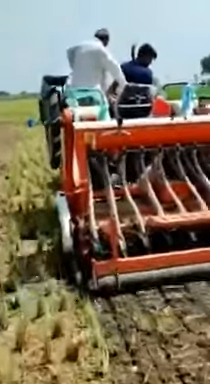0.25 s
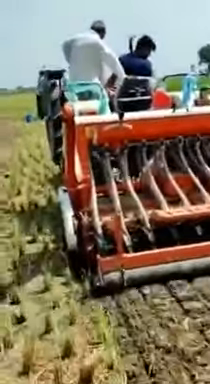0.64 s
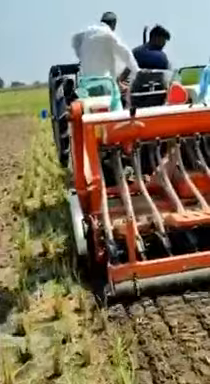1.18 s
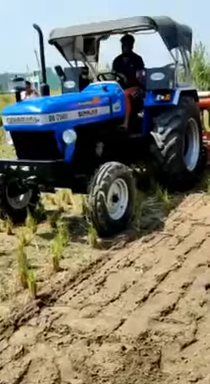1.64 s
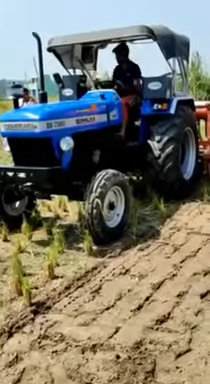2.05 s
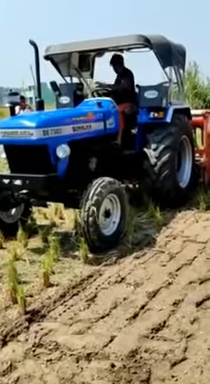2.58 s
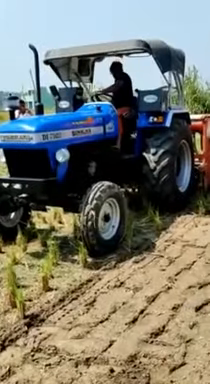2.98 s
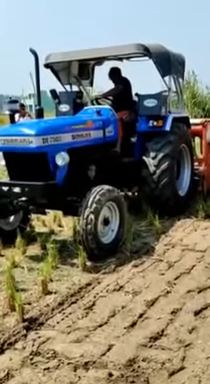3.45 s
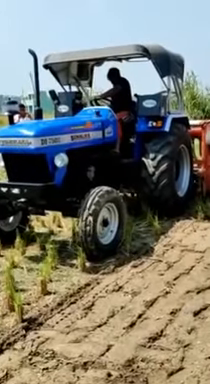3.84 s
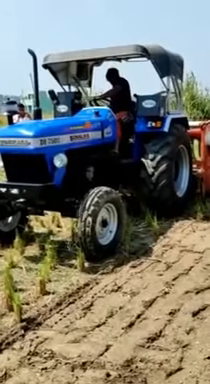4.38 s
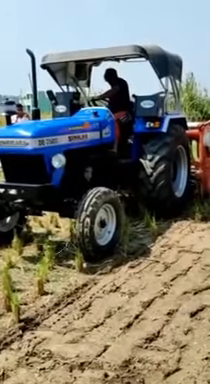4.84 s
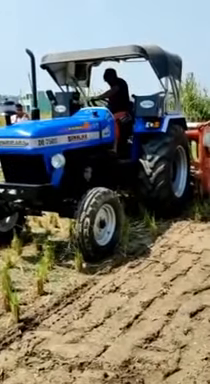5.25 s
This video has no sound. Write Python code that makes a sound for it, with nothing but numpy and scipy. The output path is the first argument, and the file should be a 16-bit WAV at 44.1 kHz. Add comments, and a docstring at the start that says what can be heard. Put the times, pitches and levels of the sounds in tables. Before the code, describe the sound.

Two working tractors, cut together. First a harsh, uneven diesel chug with bright knocking and dry metallic jolts from the seed drill, for just over a second. After a quarter-second gap comes a slower-running engine from the front, a steady low throb with dense clatter and faint gear whine, gradually nearing. Gusts rumble and flutter on the left; the covered right side carries dull wind and very little engine.

```python
"""Two four-cylinder diesel tractors work a field under load, one after the other, a short silence between.
The first is heard from the rear, behind its seed drill: exhaust beat, rattle, drive tones, clanking steel.
The second, slower-running, is heard from the front and draws nearer: firing throb, clatter and gear whine.
Each engine is tones locked to the crank plus noise struck by combustion and ringing in the metal.
Wind, as noise swelled by gusts, buffets two microphone ports: left open, right covered and mostly rumble."""
import sys
import numpy as np
from scipy.fft import rfft, irfft, next_fast_len
from scipy.io import wavfile
from scipy.ndimage import uniform_filter1d, minimum_filter1d, map_coordinates

SR = 44100
rng = np.random.default_rng(int(sys.argv[2]) if len(sys.argv) > 2 else 0)


def dump_mix(stems):
    """Bounce the given channels to the path in sys.argv[1] as a 16-bit WAV at rate SR."""
    frames = np.atleast_2d(stems).T  # one column per channel
    limited = np.clip(frames, -1, 1)  # hard clip at full scale
    pcm = np.round(limited * 32767).astype(np.int16)
    wavfile.write(sys.argv[1], SR, pcm)


N = 242991

# Wind rumble and flutter on the open left port: (frequency [Hz], density [dB per Hz])
OPEN_RUMBLE = [(3, -11), (12, 6), (30, -10), (45, -11.5), (70, -16.5), (130, -31.5), (500, -85)]
OPEN_FLUTTER = [(30, -27), (70, 4), (110, -6), (180, -6), (300, -12.5), (700, -32), (3000, -52)]
# Wind rumble on the right port, its cover held loosely or tightly: (frequency [Hz], density [dB per Hz])
LOOSE_RUMBLE = [(3, -10), (11, 0), (28, -8), (65, -13), (100, -18), (170, -30), (320, -42), (1000, -65),
                (4000, -110)]
TIGHT_RUMBLE = [(3, -10), (10, 5.5), (16, -3.5), (25, -20), (38, -15.5), (60, -37), (95, -43), (150, -54),
                (300, -73), (1000, -76.5), (5000, -110)]
# What passes the cover of the right port, held loosely or tightly: (frequency [Hz], gain [dB])
LOOSE_COVER = [(80, -4), (200, -9.5), (280, -9.5), (420, -27), (620, -16.5), (860, -12.5), (1010, -28.5),
               (1250, -18), (2000, -22.5), (5000, -34), (9000, -49)]
TIGHT_COVER = [(60, -42), (300, -43), (1000, -45.5), (2200, -42), (3000, -37), (5000, -47), (10000, -64)]
# Steady wind by each tractor: (open rumble [dB], open flutter [dB], covered rumble [dB])
REAR_BREEZE = (-18, -27, -9.5)
FRONT_BREEZE = (-29, -38, -10)
# Gusts and lulls on top of the breeze:
# (time [s], half length [s], added open rumble [dB], added open flutter [dB], added covered rumble [dB])
GUSTS = [(0.466, 0.14, -2, 4, 2), (0.968, 0.22, -6, 1, -0.5), (2.257, 0.076, 5.5, 4, -3.5),
         (2.56, 0.2, -1, 0, 11.5), (2.99, 0.41, -5, 0, -7.5), (3.498, 0.19, 12, 10, -1.5),
         (3.654, 0.069, 10.5, 3, 3.5), (4.211, 1, 6, 4, 0.5), (5.32, 0.046, 9, 0, 1.5)]
# Single eddies that hit a port: (time [s], level [dB], half length [s], side [0 left, 1 right])
PUFFS = [(0.195, -21, 0.014, 1), (0.29, -24.5, 0.03, 0), (0.44, -23, 0.035, 0), (0.555, -18.5, 0.035, 0),
         (0.662, -14.5, 0.042, 1), (0.736, -26, 0.051, 0), (1.024, -13.5, 0.017, 1),
         (2.276, -16.5, 0.023, 0), (3.302, -14, 0.019, 0), (3.447, -19, 0.015, 0), (3.503, -16.5, 0.021, 0),
         (3.561, -18.5, 0.042, 0), (3.636, -17, 0.015, 0), (3.715, -25, 0.019, 0), (4.644, -24, 0.03, 0),
         (5.268, -23, 0.051, 0)]
# Colour of the puffs at the open and the covered port: (frequency [Hz], density [dB per Hz])
PUFF_COLOUR = [(40, 1.5), (100, 5), (170, 1), (330, -7.5), (800, -18), (3000, -55)]
THUD_COLOUR = [(40, -17.5), (110, 9), (180, -4), (400, -23), (800, -26), (3000, -79)]
# The cover shifts on the right port: (time [s], level [dB], half length [s])
RUBS = [(1.595, -23, 0.0062), (1.627, -27, 0.0039), (2.368, -40, 0.033), (2.528, -32, 0.03),
        (4.505, -31, 0.033)]
# Colour of those scuffs: (frequency [Hz], density [dB per Hz])
RUB_COLOUR = [(40, -9), (110, 4), (250, -14), (600, -22), (2000, -36), (6000, -52), (12000, -70)]
# Sound at the open port sinks, then creeps back:
# (start [s], depth [dB], sinking time [s], recovery time constant [s])
DIPS = [(1.46, 6, 0.038, 0.14), (2.46, 5, 0.064, 0.91), (2.58, 5, 0.095, 0.5)]

# Loose steel on the seed drill: (time [s], level [dB])
CLANKS = [(0.014, -26), (0.039, -24), (0.163, -24), (0.485, -23), (0.535, -20.5), (0.585, -25),
          (1.005, -22), (1.103, -28), (1.176, -24.5), (1.246, -29)]
# Colour of the clanks: (frequency [Hz], density [dB per Hz])
CLANK_COLOUR = [(300, -11.5), (1000, -1.5), (3000, -2.5), (7000, -21), (15000, -37)]
# The drill's frame rings up under the load: (time [s], half length [s], frequency [Hz], level [dB])
FRAME_RINGS = [(0.254, .04, 1120, -34), (0.584, 0.044, 630, -31), (0.698, .04, 1120, -33),
               (0.898, .06, 640, -31), (1.039, .04, 635, -36.5), (1.19, .05, 657, -32)]

# The engine swells briefly: (time [s], half length [s], added level [dB])
SWELLS = [(1.224, 0.091, 2.5), (1.754, 0.02, 1.5), (2.339, 0.21, 2), (3.256, 0.015, 2), (3.977, 0.028, 2),
          (4.803, 0.26, 0.8), (5.254, 0.15, 1.8)]
# Exhaust lines of the rear tractor: (multiple of the cycle rate, level within the exhaust layer [dB])
REAR_ORDERS = [(2, -3), (3, -9.5), (4, 5.5), (6, -11), (7, -7), (10, -8.5), (12, -12.5), (22, -22),
               (26, -22), (49, -18)]
# Its drive tones: (frequency [Hz], level within the gear layer [dB])
REAR_GEARS = [(279, -13.5), (351.6, -20.5), (494.4, -22), (583, -17.5), (617, -13.5), (652, -16.5),
              (867, -23.5), (1111, -18.5)]
# Colour of its clatter: (frequency [Hz], density [dB per Hz])
REAR_COLOUR = [(25, -8.5), (90, 5.5), (300.0, -1.5), (450.0, -1.5), (950.0, -7), (1550.0, -10.5),
               (3100.0, -15.5), (5500.0, -18), (8000.0, -21.5), (10500.0, -30), (15500.0, -32.5)]
# Its block and sheet metal resonances: (frequency [Hz], half width [Hz], boost [dB])
REAR_PANELS = [(598, 166, 4.5), (870, 19.7, 7), (1110, 94, 7), (1220, 81, 4.5), (1626, 78, 7.5),
               (2340, 220, 3.5), (2940, 280, 4), (3600, 300, 0.5), (6870, 360, 3.5)]
# Colour of its hard knock: (frequency [Hz], density [dB per Hz])
KNOCK_COLOUR = [(200, -7), (600, -3.5), (1000, 9), (1700, 1.5), (3000, -3.5), (4500, -15.5), (7000, -11),
                (10000, -23), (15000, -32.5)]

# Speed of the front tractor, varying slightly under load: (time [s], four-stroke cycles [1/s])
FRONT_SPEED = [(1.5, 15.11), (2.9, 15.12), (3.7, 15.07), (4.2, 15.1), (4.7, 15.07), (5.5, 15.07)]
# Its throb: (time [s], firing tone relative level [dB], its octave relative level [dB])
THROB = [(1.6, 3.5, -3), (2.8, 3.5, -6.5), (3.6, 3.5, -7), (4.2, 4.5, -21), (5.0, 4.5, -7.5),
         (5.5, 4.8, -12)]
# Its exhaust and block lines: (multiple of the cycle rate, level within the exhaust layer [dB])
FRONT_ORDERS = [(6, -12.5), (10, -16), (12, -13), (15, -15.5), (16, -15), (18, -20), (19, -9.5), (28, -20),
                (33, -19), (37, -17.5), (40, -16.5), (43, -21), (44, -18), (45, -19.5), (46, -18.5),
                (48, -18), (50, -19), (52, -17), (67, -18), (68, -20), (71, -14.5), (72, -24), (76, -16),
                (79, -20.5), (80, -21), (81, -17), (87, -18.5), (100, -21)]
# Its drive tones: (frequency [Hz], level within the gear layer [dB])
FRONT_GEARS = [(200.5, -15), (351.2, -13)]
# Colour of its clatter: (frequency [Hz], density [dB per Hz])
FRONT_COLOUR = [(25, -4), (90, 5), (220, 1), (340, -1.5), (480, -0.5), (950, -6), (1550, -4.5),
                (3100, -16.5), (5500, -16.5), (8000, -21.5), (10500, -29), (15500, -35.5)]
# Its block and sheet metal resonances: (frequency [Hz], half width [Hz], boost [dB])
FRONT_PANELS = [(590, 110, 4), (786, 66, 4.5), (1160, 145, 4), (2236, 200, 5), (2830, 197, 8),
                (3380, 170, 7.5), (3890, 265, 5.5), (4690, 460, 3)]

# Silence between the tractors: (start [s], end [s])
SILENCE = (1.269, 1.526)

REAR_SPEED = 20.26  # four-stroke cycles per s
REAR_DB = -24  # base gain of the rear engine
FRONT_DB, APPROACH_DB_PER_S = -24, 0.67  # base gain at 2 s; it grows as the tractor nears
TOP_HZ = 15800  # band limit


def amp(db):
    """Decibels to gain."""
    return 10 ** (np.asarray(db) / 20)


def unit(x):
    """Scale to rms 1."""
    return x / np.sqrt(np.mean(x ** 2) + 1e-20)


def along(points, hz):
    """(Hz, value) points read on a log frequency axis."""
    f, v = np.transpose(points)
    return np.interp(np.log(hz + 0.0011), np.log(f), v)


def curves(rows):
    """One value per sample for each column after the time."""
    s, *columns = np.transpose(rows)
    return [np.interp(np.arange(N) / SR, s, column) for column in columns]


def wobble(rate):
    """A smooth random curve, rate knots a second."""
    knots = rng.standard_normal(int(N * rate / SR) + 4)
    return map_coordinates(knots, [np.arange(N) * rate / SR])


def bump(s, half_length):
    """A smooth swell of height 1 around time s, down to 1/e at half_length."""
    return np.exp(-((np.arange(N) / SR - s) / half_length) ** 2)


def filtered(x, response):
    """x times a response of frequency."""
    size = next_fast_len(N + SR // 2)
    return irfft(rfft(x, size) * response(np.fft.rfftfreq(size, 1 / SR)), size)[..., :N]


def shaped(x, points):
    """x through a (Hz, dB) curve."""
    return filtered(x, lambda hz: amp(along(points, hz)))


def eddies(spectrum, hold):
    """Turbulence on a port, evened out over hold seconds so that the gusts set its level."""
    x = shaped(rng.standard_normal(N), spectrum)
    power = uniform_filter1d(x ** 2, int(hold * SR) + 1)
    return x / np.sqrt(np.abs(power) + 1e-20)


def wind(breeze, covered_spectrum, restless_db):
    """Separate eddies at each port; gusts swell over a restless breeze, with flutter on the open port."""
    gusts = sum(np.outer(added, bump(s, length)) for s, length, *added in GUSTS)
    rumble, flutter, covered = [amp(steady + gust + restless_db * wobble(6.9))
                                for steady, gust in zip(breeze, gusts)]
    left = rumble * eddies(OPEN_RUMBLE, hold=0.049)
    left += flutter * eddies(OPEN_FLUTTER, hold=0.15)
    right = covered * eddies(covered_spectrum, hold=0.23)
    return np.array([left, right])


def puffs():
    """Short blows of wind: a ragged flap on the open port, a dull thud on the covered one."""
    swell = np.zeros((2, N))
    for s, db, length, side in PUFFS:
        swell[int(side > .5)] += amp(db) * bump(s, length)
    return swell * np.array([eddies(PUFF_COLOUR, hold=0.027), eddies(THUD_COLOUR, hold=0.029)])


def rubs():
    """Faint, dull scuffs of the cover, on the right port alone."""
    scuffs = sum(amp(db) * bump(s, length) for s, db, length in RUBS)
    return np.array([np.zeros(N), scuffs * eddies(RUB_COLOUR, hold=0.032)])


def dips():
    """Gain of the level dips: straight down in dB, then easing back exponentially."""
    t = np.arange(N) / SR
    depth_db = np.zeros(N)
    for s, depth, sink, recover in DIPS:
        sinking = np.clip((t - s) / sink, 0, 1)
        recovery = np.exp(-np.maximum(t - s - sink, 0) / recover)
        depth_db += depth * sinking * recovery
    return amp(-depth_db)


def frame_rings(width_hz):
    """Brief, hoarse swells of the drill frame's resonances, as narrow bands of noise."""
    out = np.zeros(N)
    for s, length, centre, db in FRAME_RINGS:
        band = lambda hz: np.exp(-((hz - centre) / width_hz) ** 2)
        out += amp(db) * bump(s, length) * unit(filtered(rng.standard_normal(N), band))
    return out


def clanks(t60):
    """The drill's tines jolt against its frame: short, dry bursts that fall 60 dB in t60 seconds."""
    t = np.arange(N) / SR
    jolts = sum(amp(db - 60 * np.abs(t - s) / t60) * (t >= s) for s, db in CLANKS)
    return jolts * unit(shaped(rng.standard_normal(N), CLANK_COLOUR))


def swells():
    """Decibels that the brief swells add to the engine."""
    return sum(db * bump(s, length) for s, length, db in SWELLS)


def crank(speed, unrest):
    """Four-stroke cycles completed so far; the governor hunts a little."""
    return np.cumsum(speed * (1 + unrest * wobble(14))) / SR


def lines(cycles, orders, waver_db, drift, spread):
    """Tones locked to the crank, wavering in level and phase (drift in radians).

    At spread 0 their phases gather into beats, near 1 they scatter into a drone."""
    out = np.zeros(N)
    for order, db in orders:
        turns = order * cycles + spread * rng.uniform(-0.53, 0.51)
        phase = 2 * np.pi * turns + drift * wobble(7)
        out -= amp(db + waver_db * wobble(5.077)) * np.sqrt(2) * np.cos(phase)
    return out


def whine(cycles, gears, waver_db, drift):
    """Gears and belts turn at fixed ratios to the crank."""
    mean_rate = cycles[-1] * SR / N
    ratios = [(hz / mean_rate, db) for hz, db in gears]
    return lines(cycles, ratios, waver_db, drift, spread=0.96)


def knocks(cycles, count, rise, decay, scatter_db):
    """Envelope of count uneven blows a cycle; rise and decay are shares of the gap between blows."""
    blow, age = np.divmod(cycles * count, 1)
    sizes = amp(scatter_db * rng.uniform(-1, 1, 1024))
    size = sizes[blow.astype(int) % 1024]
    return unit(size * (1 - np.exp(-age / rise)) * np.exp(-age / decay))


def knocking(cycles, level_db):
    """Once every turn of the crank a hard, bright knock stands out of the rattle."""
    blows = knocks(cycles + .2, count=2, rise=.1, decay=.22, scatter_db=1.5)
    return amp(level_db) * unit(shaped(blows * rng.standard_normal(N), KNOCK_COLOUR))


def clatter(cycles, blows, colour, panels, knock_share, repeat_share, repeat_hz):
    """Combustion knock over a steady churn, ringing in the block; its lower part repeats every cycle."""
    pattern = rng.standard_normal(SR // 20)
    place = cycles % 1 * len(pattern)
    repeating = unit(map_coordinates(pattern, [place], mode="grid-wrap"))
    share = lambda hz: repeat_share / (1 + (hz / repeat_hz) ** 2)  # power share of the repeating part
    noise = filtered(repeating, lambda hz: np.sqrt(share(hz)))
    noise += filtered(rng.standard_normal(N), lambda hz: np.sqrt(1 - share(hz)))
    force = noise * np.sqrt(1 - knock_share + knock_share * blows ** 2)
    ring_db = lambda hz: sum(db * np.exp(-((hz - centre) / width) ** 2) for centre, width, db in panels)
    return unit(filtered(force, lambda hz: amp(along(colour, hz) + ring_db(hz))))


def from_rear():
    """From behind: a deep, uneven exhaust beat and a hard rattle once every turn of the crank."""
    cycles = crank(REAR_SPEED, unrest=0.0021)
    blows = knocks(cycles + .2, count=4, rise=.04, decay=.45, scatter_db=2)
    rattle = amp(-1.0) * clatter(cycles, blows, REAR_COLOUR, REAR_PANELS,
                                 knock_share=0.22, repeat_share=0.42, repeat_hz=1000)
    exhaust = lines(cycles, REAR_ORDERS, waver_db=1.5, drift=0.099, spread=0.31)
    exhaust *= amp(0.7 + 0.77 * wobble(40.6))  # uneven beat
    gears = amp(1.5) * whine(cycles, REAR_GEARS, waver_db=3.0, drift=0.77)
    steel = knocking(cycles, level_db=-7)
    engine = amp(REAR_DB + swells() + 0.2 * wobble(5.1)) * (rattle + steel + exhaust + gears)
    tractor = engine + clanks(t60=0.046) + frame_rings(width_hz=25)
    ports = np.array([tractor, shaped(tractor, LOOSE_COVER)])
    return ports + wind(REAR_BREEZE, LOOSE_RUMBLE, restless_db=1.1)


def from_front():
    """From the front, drawing nearer: a throb at the firing rate, dense diesel clatter and gear whine."""
    cycles = crank(curves(FRONT_SPEED)[0], unrest=0.00159)
    blows = knocks(cycles, count=4, rise=0.03, decay=1.0, scatter_db=4.5)
    rattle = amp(1.38) * clatter(cycles, blows, FRONT_COLOUR, FRONT_PANELS,
                                 knock_share=0.27, repeat_share=0.16, repeat_hz=2400)
    firing = 2 * np.pi * 4 * cycles  # four firings a cycle
    firing_db, octave_db = curves(THROB)
    throb = np.sqrt(2) * (amp(firing_db) * np.sin(firing) + amp(octave_db) * np.sin(2 * firing))
    exhaust = amp(-2.5) * lines(cycles, FRONT_ORDERS, waver_db=3, drift=0.67, spread=0.97)
    gears = whine(cycles, FRONT_GEARS, waver_db=3.0, drift=0.79)
    approach_db = APPROACH_DB_PER_S * (np.arange(N) / SR - 2)
    level_db = FRONT_DB + approach_db + swells() + 0.41 * wobble(6.4)
    engine = amp(level_db) * (rattle + throb + exhaust + gears)
    ports = np.array([engine, shaped(engine, TIGHT_COVER)])
    left, right = ports + wind(FRONT_BREEZE, TIGHT_RUMBLE, restless_db=2.5)
    return np.array([dips() * left, right])


def scene():
    """One tractor, a moment of silence, then the other."""
    t = np.arange(N) / SR
    fade = lambda share: np.sin(np.pi / 2 * np.clip(share, 0, 1)) ** 2
    first = fade(t / .004) * fade((SILENCE[0] - t) / .003)
    fade_in_s = np.array([[.004], [.03]])  # the right port swells in more slowly
    second = fade((t - SILENCE[1]) / fade_in_s)
    return first * from_rear() + second * from_front() + puffs() + rubs()


def record(dry):
    """A limiter at each port holds down the biggest peaks; nothing is kept above the band limit."""
    needed = np.minimum(1, .92 / (np.abs(dry) + 1e-9))
    window = SR // 50  # 20 ms
    gain = uniform_filter1d(minimum_filter1d(needed, size=window), size=window)
    return filtered(dry * gain, lambda hz: np.clip((TOP_HZ - hz) / 200 + .5, 0, 1))


dry = scene()
out = record(dry)
dump_mix(out)
```